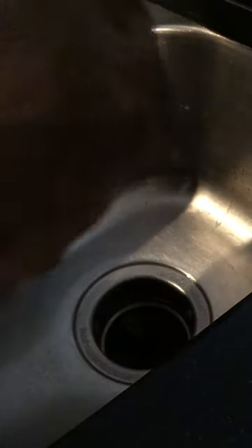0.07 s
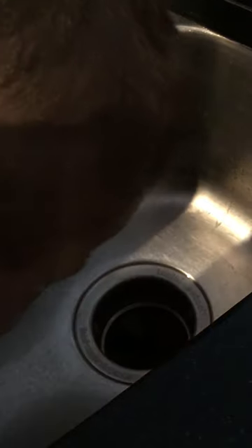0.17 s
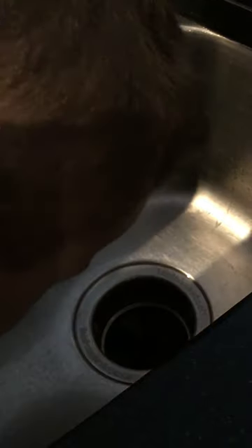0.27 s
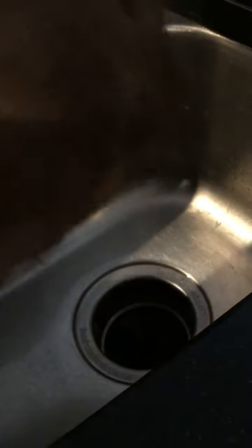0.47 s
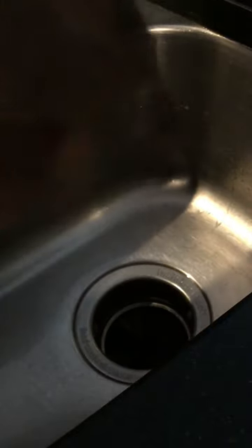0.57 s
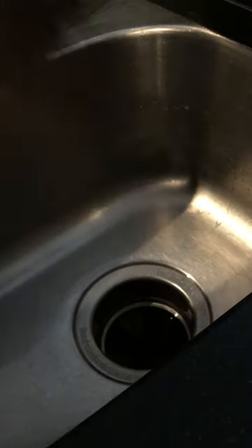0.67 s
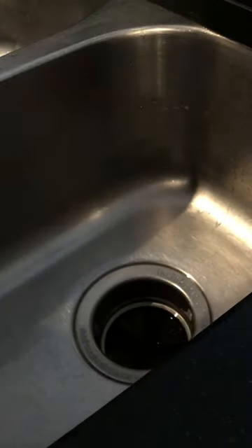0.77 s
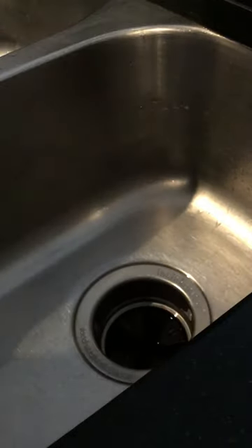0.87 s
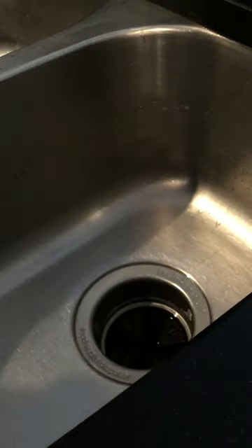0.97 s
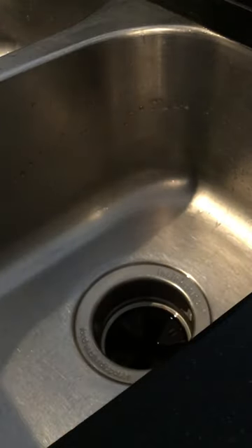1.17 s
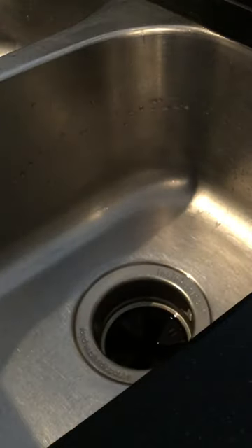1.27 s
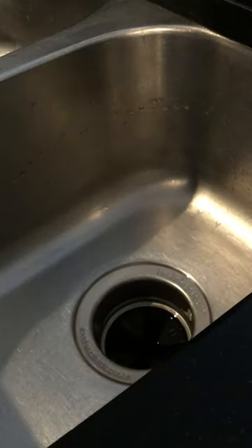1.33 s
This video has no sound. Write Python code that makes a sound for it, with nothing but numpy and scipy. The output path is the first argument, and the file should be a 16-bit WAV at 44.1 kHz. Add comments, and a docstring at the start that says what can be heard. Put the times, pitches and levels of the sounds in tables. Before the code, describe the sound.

A kitchen sink drain glugs and rumbles briefly, then fades to light dripping.

```python
"""Kitchen sink draining

At a steel sink in a small, quiet kitchen, on one microphone. A quick run of big air bubbles glugs in
the pipe and sets the basin booming, over a low rumble and a short wash of water. Droplets tick,
splashes ring the steel, a faint whistle lingers, and soft knocks on the sink close the scene."""
import sys
import numpy as np
from scipy import signal
from scipy.fft import rfft, irfft
from scipy.io import wavfile

SR = 44100
rng = np.random.default_rng(int(sys.argv[2]) if len(sys.argv) > 2 else 0)


def store_wav(level_fs):
    """Save 16-bit WAV to argv[1]."""
    pcm = np.round(np.clip(np.atleast_2d(level_fs), -1, 1) * 32767)
    wavfile.write(sys.argv[1], SR, pcm.T.astype(np.int16))


N = 61739
T = np.arange(N) / SR

# Room tone of the kitchen. Each row: frequency in Hz, level in dB.
ROOM_TONE_SPECTRUM = [(25, -27), (50, -4.5), (64, 4), (100, -9.5), (160, -2), (310, -3), (400, -12),
                      (530, -12), (650, -18.5), (820, -28), (1250, -21), (1600, -28), (1950, -19.5),
                      (2400, -29), (3000, -26), (6000, -46), (15000, -45)]
# Course of the faint whistle. Each row: time in seconds, pitch in Hz, level in dB.
WHISTLE_CURVE = [(.66, 470, -69), (.71, 528.4, -54.5), (.75, 574.7, -51), (.80, 584.4, -59),
                 (.87, 639.8, -63.5), (.94, 570, -56), (1.03, 542, -61.5), (1.4, 546, -62)]
# Flow over the steel. Each row: time in seconds, wash level in dB, spatter level in dB.
BASIN_FLOW = [(0, -66, -58.5), (.16, -64, -70), (.235, -47, -58.5), (.31, -56, -61.5), (.36, -50, -61),
              (.55, -58, -64.5), (.66, -64.5, -71.5), (.86, -71.5, -71), (.96, -65, -67.5),
              (1.2, -67.5, -80), (1.4, -59.5, -68)]
# Colours of the wash and the spatter. Each row: frequency in Hz, gain in dB.
WASH_SPECTRUM = [(380, -29), (650, -6), (1430, -8), (1580, -13.5), (1890, -2.5), (2150, -19.5), (2800, -7),
                 (3030, -41), (3320, -13.5), (4200, -29.5), (5460, -63)]
SPATTER_SPECTRUM = [(2400, -7), (3300, -1), (3850, -0.5), (4300, -11.5), (4850, 3), (5800, -11),
                    (7900, -5.5), (10000, -12), (11000, -6.5), (16000, -2)]
# Flow down in the pipe. Each row: time in seconds, rumble level in dB, churn level in dB.
PIPE_FLOW = [(.17, -68.5, -70.5), (.23, -43, -30.5), (.38, -46, -39.5), (.43, -32.5, -39),
             (.57, -32.5, -41), (.68, -36.5, -55.5), (.82, -45, -70), (.9, -59, -81), (1.02, -54, -59.5),
             (1.2, -60, -74)]
# Colours of the rumble and the churning. Each row: frequency in Hz, gain in dB.
RUMBLE_SPECTRUM = [(35, -41.5), (60, -26), (95, -2), (158, 4.5), (190, -9), (240, 6), (320, -10),
                   (450, -48)]
CHURN_SPECTRUM = [(180, -21.5), (290, 8.5), (350, 1), (430, -5), (560, -5), (630, -26.5), (900, -27)]
# Ringing of the sink wall. Each row: frequency in Hz, level in dB, time to fall 60 dB in seconds.
WALL_MODES = [(306.6, 6, 0.2), (417, -4.5, 0.32), (546, -0.5, 0.13), (1041.5, 3, 0.14), (1103, -3, 0.23),
              (1217, 1.5, 0.11), (1345, -4, 0.18), (1637, -3.5, 0.098), (2066, -8.5, 0.078),
              (3045, -12, 0.32)]
# Soft knocks on the sink. Each row: start in seconds, ring level in dB, thud level in dB.
SINK_KNOCKS = [(1.072, -63, -59), (1.291, -61.5, -45), (1.303, -58.5, -62), (1.342, -53.5, -30),
               (1.356, -65, -54)]
# Spits of spray. Each row: start in seconds, level in dB, centre pitch in Hz.
SPRAY_SPITS = [(.007, -50.5, 12500), (0.04, -49.5, 9540), (0.059, -47.5, 9120), (0.139, -47.5, 8880),
               (0.216, -51, 10000), (.222, -47, 5200), (.286, -39, 14000), (.356, -57, 6500),
               (0.375, -45.5, 11000), (0.497, -54, 8400), (.535, -55.5, 8000), (0.633, -59, 12000),
               (0.701, -56.5, 6550), (.766, -53, 6440), (0.958, -57.5, 5500), (1.075, -56, 9850),
               (1.132, -54.5, 13400), (1.289, -54, 4560)]
# Droplets, and at 1.072 s the pitched ring of a soft knock on the sink. Each row: start in seconds, level in
# dB, pitch in Hz.
DROPLETS = [(.004, -55, 5060), (0.026, -50, 2220), (0.039, -34.5, 1908), (0.128, -52.5, 3890),
            (0.163, -52.5, 9240), (0.171, -37.5, 1688), (0.356, -52, 4860), (0.373, -47, 10900),
            (.381, -49.5, 4804), (0.386, -45.5, 1933), (0.419, -29, 1900), (0.467, -49, 2340),
            (0.487, -36.5, 1880), (.496, -50.5, 3580), (0.511, -53.5, 3590), (0.581, -29, 1872),
            (.721, -43.5, 2033), (0.764, -45, 3615), (.792, -50.5, 3610), (0.918, -42, 1281),
            (.931, -52, 4880), (.936, -56, 5860), (.936, -48, 1196), (.962, -44, 1250), (0.987, -46, 1238),
            (1.015, -55, 1010), (1.068, -50.5, 1290), (1.072, -41, 783), (1.103, -46.5, 3020),
            (1.125, -52.5, 2944), (1.152, -52, 1290), (1.297, -46.5, 2190), (1.358, -49.5, 2980)]
# Splashes that tap the steel. Each row: start in seconds, level in dB, brightness in dB per octave.
SPLASHES = [(.170, -48, 5), (.2225, -42, 1), (0.239, -40.5, 6), (.268, -45.5, -14.5), (.337, -44, -1.5),
            (0.389, -49.5, -0.5), (.422, -51.5, -7), (.548, -57.5, -4)]
# Ringing of the steel. Each row: frequency in Hz, level in dB, time to fall 60 dB in seconds.
STEEL_MODES = [(570, -0.5, 0.06), (767, -2.5, 0.05), (990, -4.5, 0.047), (1091, -1, 0.034),
               (1420, -7, 0.086), (1707, -10.5, 0.081), (1880, -8.5, 0.026), (1940, -12, 0.14),
               (2736, -12, 0.1), (3363, -29, 0.16), (3397, -24, 0.13), (3710, -35, 0.092),
               (4880, -33, 0.18), (5400, -32, 0.13), (8400, -41.5, 0.23)]
# Low resonances of the basin. Each row: frequency in Hz, width in Hz, gain in dB.
BASIN_BOOM = [(160, 7.8, -7.5), (235.5, 11.5, 0), (292, 23.3, -6), (456, 27, -23), (563, 3.5, -13)]
# Air bubbles in the drain. Each row: start in seconds, level in dB, settled pitch in Hz, fade in seconds.
DRAIN_BUBBLES = [(0.172, -29, 296, 0.024), (.219, -22.5, 368, 0.013), (0.220, -16, 275.6, 0.017),
                 (0.236, -14, 247.4, 0.041), (0.265, -9.5, 236.6, 0.038), (.311, -15.5, 242.2, 0.025),
                 (0.319, -26, 470, 0.0083), (.320, -28, 375, 0.024), (0.336, -1.5, 253.8, .013),
                 (0.367, -9.5, 273, 0.011), (0.385, -12.5, 266, .016), (.404, -12, 236, 0.013),
                 (0.407, -26, 104.8, 0.023), (.418, -20, 167.6, 0.027), (.420, -32, 488, 0.014),
                 (0.426, -15, 258, 0.012), (0.44, -11.5, 235.5, 0.014), (.464, -8, 268.7, 0.01),
                 (.484, -10.5, 243.1, 0.027), (.483, -17, 138.7, 0.014), (.527, -22.5, 149.7, 0.053),
                 (.531, -7.5, 228.7, 0.006), (0.548, -12, 272, 0.0091), (.555, -27.5, 461, 0.0088),
                 (.560, -7.5, 233, 0.017), (.597, -21.5, 130.3, 0.017), (.639, -36, 371, 0.013),
                 (.642, -21.5, 233.5, 0.024), (0.654, -26, 104.3, 0.022), (.686, -21, 227.2, 0.023),
                 (.714, -30, 237.5, .034), (.762, -33, 262, 0.012), (.787, -29.5, 120, 0.037),
                 (.842, -35.5, 246, 0.015), (1.0, -42.5, 164, 0.04)]

SPLASH_RISE_S, GRAIN_SPREAD_DB = 0.0024, 8.5
LN_1000 = np.log(1000)   # a fall of 60 dB, as an exponent


def from_db(db):
    """Decibels to gain."""
    return 10 ** (np.asarray(db) / 20)


def rms_one(x):
    """Scale to unit level."""
    return x / np.sqrt(np.mean(x ** 2) + 1e-20)


def in_time(rows):
    """Each column of a curve, sample by sample."""
    s, *columns = np.transpose(rows)
    return [np.interp(T, s, c) for c in columns]


def coloured(x, spectrum):
    """Filter a signal by a spectrum; unit level."""
    hz, db = np.transpose(spectrum)
    f = np.maximum(np.fft.rfftfreq(2 * N, 1 / SR), 1)
    gain = from_db(np.interp(np.log(f), np.log(hz), db, left=-90, right=-90))
    return rms_one(irfft(rfft(x, 2 * N) * gain)[:N])


def drift(hz):
    """Slow random wander of spread 1."""
    r = np.exp(-2 * np.pi * hz / SR)
    return rms_one(signal.lfilter([1], [1, -2 * r, r * r], rng.standard_normal(2 * N))[N:])


def since(s):
    """Time since an onset, zero before it."""
    return np.maximum(T - s, 0)


def onset(s, rise_s):
    """A smooth rise from 0 towards 1."""
    return 1 - np.exp(-since(s) / rise_s)


def ring(s, hz, t60):
    """A struck mode of height 1."""
    t = since(s)
    return np.sin(2 * np.pi * hz * t) * np.exp(-LN_1000 * np.minimum(t / t60, 10))


def resonate(x, hz, width_hz):
    """A resonance with gain 1 at its top."""
    r = np.exp(-np.pi * width_hz / SR)
    feedback = [1, -2 * r * np.cos(2 * np.pi * hz / SR), r * r]
    return signal.lfilter(np.array([1, 0, -1]) * (1 - r * r) / 2, feedback, x + 1e-18)


def add(out, s, sound):
    """Mix a short sound in at a time."""
    start = int(np.clip(s * SR, 0, N - 1))
    out[start:start + len(sound)] += sound[:N - start]


def grains(per_s=2300):
    """Dense tiny impacts of uneven size."""
    sizes = from_db(GRAIN_SPREAD_DB * np.minimum(rng.exponential(1, N), 4)) * rng.choice([-1, 1], N)
    return sizes * (rng.random(N) < per_s / SR)


def fizz(low_hz, high_hz, per_s, t60, flutter_db, count=64):
    """Clumps of small bubbles, each ringing briefly at one of many pitches."""
    born = rng.random(N) < per_s / SR
    sizes = born * from_db(GRAIN_SPREAD_DB * np.minimum(rng.exponential(1, N), 4) + flutter_db * drift(40))
    pitch_index = rng.integers(0, count, N)
    pitches = np.geomspace(low_hz, high_hz, count) * np.exp(rng.normal(0, .01, count))
    return rms_one(sum(resonate(sizes * (pitch_index == k), hz, LN_1000 / np.pi / t60) * np.sqrt(hz)
                       for k, hz in enumerate(pitches)))


def room_tone():
    """The low, steady hush of the kitchen."""
    return from_db(-59) * coloured(rng.standard_normal(N), ROOM_TONE_SPECTRUM)


def kitchen_tail(x, t60=0.38, delay_s=0.013):
    """The small room's diffuse tail reaches the microphone just after the direct sound."""
    tail = rng.standard_normal(N) * np.exp(-LN_1000 * T / t60) * onset(delay_s, rise_s=0.0022)
    return signal.fftconvolve(x, tail / np.sqrt(np.sum(tail ** 2)))[:N]


def trickle(start_s=0.886):
    """The faint grains of a last trickle keep the sink wall singing."""
    drive = grains() * onset(start_s, rise_s=0.045)
    wall = sum(from_db(db) * resonate(drive, hz, LN_1000 / np.pi / t60) for hz, db, t60 in WALL_MODES)
    return from_db(-70.5) * rms_one(wall)


def whistle(clear_at_s=0.95, clearing_s=0.043, waver=0.0036, width_hz=25):
    """An airy tone rises and falls back, clearing to a thin line as the gurgle dies."""
    hz, db = in_time(WHISTLE_CURVE)
    clear = (1 + np.tanh((T - clear_at_s) / clearing_s)) / 2
    phase = 2 * np.pi * np.cumsum(hz * (1 + waver * drift(51))) / SR
    air = (drift(width_hz) * np.sin(phase) + drift(width_hz) * np.cos(phase)) / np.sqrt(2)
    level = from_db(db - drift(21)) * onset(WHISTLE_CURVE[0][0], rise_s=0.0087)
    return level * (np.sqrt(clear) * np.sin(phase) + np.sqrt(1 - clear) * air)


def running_water():
    """Rumble and churning down the pipe; a bubbly wash and crackling spatter up on the steel."""
    wash_db, spatter_db = in_time(BASIN_FLOW)
    rumble_db, churn_db = in_time(PIPE_FLOW)
    wash = fizz(620, 2200, per_s=2000, t60=0.033, flutter_db=2) + from_db(4) * rms_one(grains())
    crackle = fizz(2500, 12000, per_s=12000, t60=0.064, flutter_db=1.5)
    hiss = from_db(-6) * rms_one(rng.standard_normal(N) * from_db(1.5 * drift(80)))
    return (from_db(rumble_db - 0.5) * coloured(rng.standard_normal(N), RUMBLE_SPECTRUM)
            + from_db(churn_db + 1.5) * coloured(grains(), CHURN_SPECTRUM)
            + from_db(wash_db - 5.5) * coloured(wash, WASH_SPECTRUM)
            + from_db(spatter_db - 4) * coloured(crackle + hiss, SPATTER_SPECTRUM))


def knocks():
    """Each knock is a dull thud with a light metallic ring from the sink wall."""
    out = np.zeros(N)
    for s, ring_db, thud_db in SINK_KNOCKS:
        out += from_db(thud_db) * ring(s, hz=204.5, t60=0.074) * onset(s, rise_s=0.0037)
        out += sum(from_db(ring_db + db) * ring(s, hz, t60) for hz, db, t60 in WALL_MODES)
    return out


def spits(count=56, scatter_s=0.0035, spread_octaves=0.36, ping_t60=0.033, mist_s=0.0038):
    """Each spit of spray scatters tiny pings around its pitch, in a puff of mist."""
    out, t = np.zeros(N), T[:N // 20]
    for s, db, centre_hz in SPRAY_SPITS:
        mist = rms_one(resonate(rng.standard_normal(len(t)), centre_hz, centre_hz / 2))
        puff = np.exp(-t / mist_s) * (1 - np.exp(-t / SPLASH_RISE_S))
        add(out, s, from_db(db - 0.5) * mist * puff)
        for lag, detune, size in rng.standard_normal((count, 3)):
            hz = min(centre_hz * 2 ** (spread_octaves * detune), SR / 2)
            ping = np.sin(2 * np.pi * hz * t) * np.exp(-LN_1000 * t / ping_t60)
            add(out, s + scatter_s * lag ** 2, from_db(db - 1.5) * size * ping / np.sqrt(count))
    return out


def droplets(rise_cycles=7.46, t60=0.036, blur_hz=138, blur_db=-5):
    """A small bubble swells and pings, and the 1.072 s knock rings the same way; each ring is blurred by the
    wet steel."""
    out, t = np.zeros(N), T[:N // 8]
    for s, db, hz in DROPLETS:
        noise = rng.standard_normal(len(t))
        blur = rms_one(resonate(resonate(noise, hz, blur_hz), hz, blur_hz))
        swell = (1 - np.exp(-(t * hz / rise_cycles) ** 2)) * np.exp(-LN_1000 * t / t60)
        add(out, s, from_db(db) * swell * (np.sin(2 * np.pi * hz * t) + from_db(blur_db) * blur))
    return out


def slaps(t60=0.06):
    """Each splash lands with a short wet slap."""
    bursts = sum(from_db(db - 3.5 - 60 * since(s) / t60) * onset(s, SPLASH_RISE_S)
                 for s, db, _ in SPLASHES)
    return bursts * coloured(rng.standard_normal(N), WASH_SPECTRUM)


def steel_ring(scatter_db=5.5):
    """Splashes strike every mode of the steel, each a little differently."""
    out = np.zeros(N)
    for s, db, tilt in SPLASHES:
        for hz, mode_db, t60 in STEEL_MODES:
            strike_db = db + mode_db + rng.normal(0, scatter_db) + tilt * np.log2(hz / 1000)
            out += from_db(strike_db) * ring(s, hz, t60) * onset(s, SPLASH_RISE_S)
    return out


def glugs(sag=0.11, sag_s=0.0084, overtone_db=-32.5):
    """Each big bubble swells within a cycle, sags in pitch and is choked off; the basin booms along."""
    bubbles, t = np.zeros(N), T[:N // 8]
    for s, db, hz, fade_s in DRAIN_BUBBLES:
        phase = 2 * np.pi * hz * (t + sag * sag_s * (1 - np.exp(-t / sag_s)))   # starts sharp, settles
        tone = np.sin(phase) + from_db(overtone_db) * np.sin(2 * phase)
        swell = 1 - np.exp(-(t * hz) ** 2)
        choke = np.exp(-(t / fade_s) ** 2.85)
        add(bubbles, s, from_db(db - 3.5) * swell * choke * tone)
    boom = sum(from_db(db) * resonate(bubbles, hz, width) for hz, width, db in BASIN_BOOM)
    return bubbles + boom


def scene():
    """The drain and the sink up close, with the kitchen well behind them."""
    background = room_tone() + running_water() + trickle() + whistle()
    gurgle = glugs()
    impacts = steel_ring() + slaps() + droplets() + spits() + knocks()
    room = kitchen_tail(from_db(-14) * gurgle + from_db(-13) * impacts)
    return (background + gurgle + impacts + room)[None]


def record(dry, low_cut_hz=45.5, high_cut_hz=16000):
    """The microphone loses the deepest bass; the top is cut steeply."""
    thinned = signal.sosfilt(signal.butter(2, low_cut_hz, "high", fs=SR, output="sos"), dry)
    return signal.sosfilt(signal.ellip(10, .1, 80, high_cut_hz, fs=SR, output="sos"), thinned)


dry = scene()
out = record(dry)
store_wav(out)
```